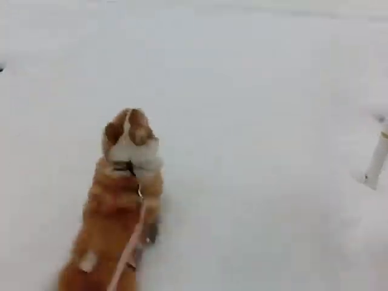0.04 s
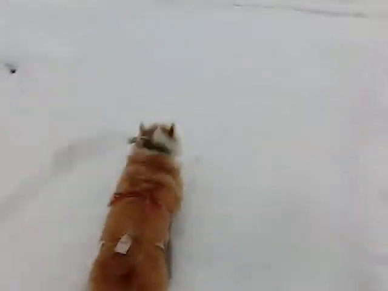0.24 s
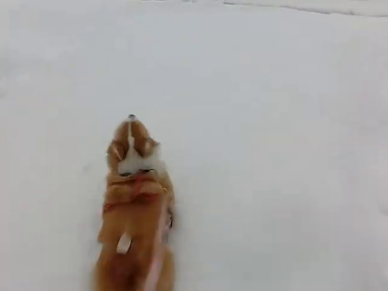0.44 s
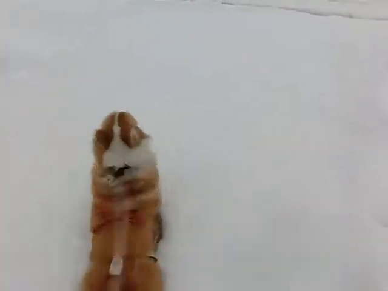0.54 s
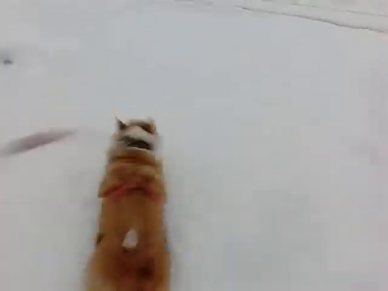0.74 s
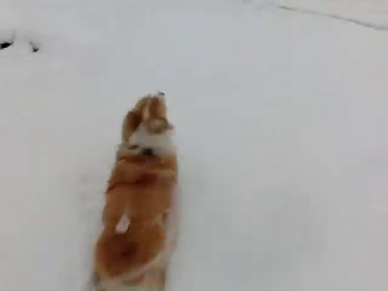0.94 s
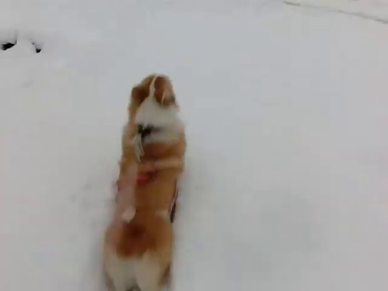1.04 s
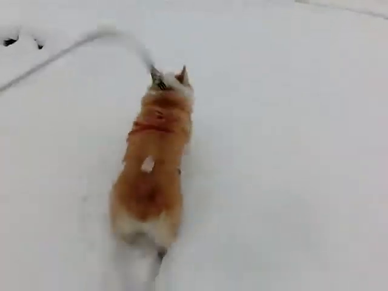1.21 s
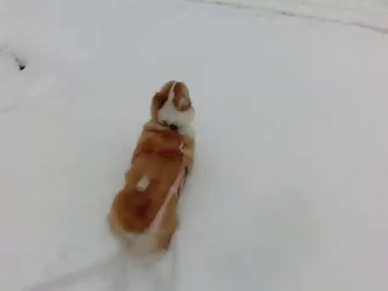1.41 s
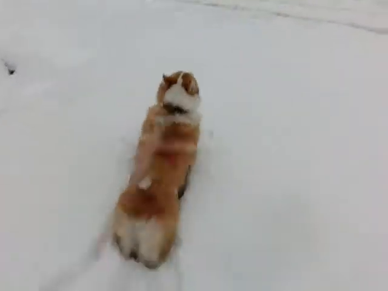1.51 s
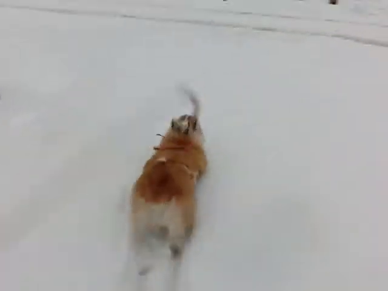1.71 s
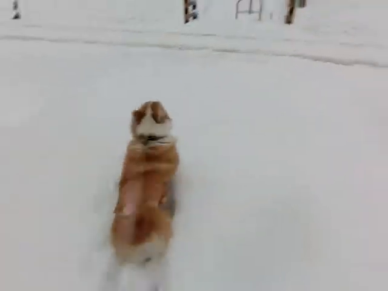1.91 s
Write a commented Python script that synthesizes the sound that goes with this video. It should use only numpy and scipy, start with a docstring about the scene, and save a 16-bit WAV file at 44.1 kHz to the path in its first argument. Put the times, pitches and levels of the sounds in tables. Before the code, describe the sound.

Collar tags and a leash clasp jingle as a dog bounds through powdery snow.

```python
"""Leashed dog bounding through snow

At each bound two metal collar tags and the leash clasp knock together, chatter and ring briefly;
a leash ring and a harness buckle join in. Paws thud and swish in the powder, the running leash
squeaks once, and wind rumbles on the microphone of a hand-held camera just behind the dog."""
import sys
import numpy as np
from scipy import signal
from scipy.fft import rfft, irfft
from scipy.io import wavfile

SR = 44100
rng = np.random.default_rng(int(sys.argv[2]) if len(sys.argv) > 2 else 0)


def dump(signal):
    """Clip the signal to [-1, 1] and save it as 16-bit WAV at the path in sys.argv[1]."""
    limited = np.clip(np.atleast_2d(signal).T, -1, 1)
    pcm = np.round(limited * 32767).astype(np.int16)
    wavfile.write(sys.argv[1], SR, pcm)


N = 85995

# blows on the bright tag: (time [s], ring level [dB], pitch [Hz], relative tick level [dB])
BRIGHT_TAG_HITS = [(0.2907, -30, 8380, -5), (0.2956, -29, 8410, -1), (0.3066, -14, 8380, -5),
                   (0.314, -16, 8380, 5), (0.3287, -29, 8330, 13), (0.4004, -24, 8410, 3),
                   (0.4707, -34, 8480, 3), (0.4773, -37, 8510, 9), (0.4831, -38, 8470, 10),
                   (0.4927, -37, 8380, 6), (0.5421, -29, 8360, -5), (0.5502, -27, 8380, 1),
                   (0.5577, -32, 8410, 7), (0.5723, -35, 8460, 8), (0.6159, -21, 8330, 11.5),
                   (0.6851, -41, 8530, 15), (0.8036, -27, 8350, -5), (0.8108, -32, 8300, 4),
                   (0.9722, -20, 8370, 4), (0.9812, -24, 8340, -5), (1.0035, -19, 8340, 0),
                   (1.0644, -28, 8390, -1), (1.0712, -31, 8380, 9), (1.0831, -28, 8410, -5),
                   (1.0904, -34, 8450, 13), (1.1171, -31, 8360, 0), (1.1455, -30, 8340, 3),
                   (1.2094, -29, 8360, 11), (1.2381, -12, 8280, -5), (1.2584, -23, 8390, -5),
                   (1.2746, -15, 8360, -5), (1.3625, -21, 8390, 8), (1.3746, -22, 8400, -1),
                   (1.3963, -21, 8360, -5), (1.438, -30, 8410, 0), (1.5153, -31, 8510, 6),
                   (1.6744, -22, 8240, -2), (1.6824, -23, 8240, 8), (1.692, -27, 8340, 5),
                   (1.8082, -36, 8390, 0), (1.8637, -38, 8380, 1)]
# resonances: (frequency [Hz], level [dB], t60 [s])
BRIGHT_TAG_MODES = [(8330, 0, .062), (8170, -11, .05), (8430, -12, .05), (8680, -19, .04), (9030, -21, .04)]
CLASP_MODES = [(11260, 4, 0.038), (11960, -7, 0.02), (10130, -10, 0.095)]
# stereo balance of the metal: (frequency [Hz], left minus right [dB])
METAL_PAN = [(3000, 0.5), (8300, 0.5), (10200, 0.5), (11300, -2), (12500, 5), (14500, 0), (16000, -9)]
# stereo width of the metal: (frequency [Hz], left-right coherence [0-1])
METAL_COHERENCE = [(1000, 0.38), (5000, 0.69), (8300, 0.79), (12500, 0.42), (15000, 0.18)]


def amp(db):
    return 10 ** (np.asarray(db) / 20)


def fade(t, t60):
    return amp(-60 * t / t60)


def unit_rms(x):
    return x / np.sqrt(np.mean(x ** 2) + 1e-20)


def event_time():
    return np.arange(6000) / SR


def curve_at(points, hz):
    knots_hz, values = np.transpose(points)
    return np.interp(np.log(hz + 1), np.log(knots_hz + 1), values)


def swell_gain(swells):
    """Bell-shaped swells, summed in power."""
    t = np.arange(N) / SR
    return np.sqrt(sum(amp(db) ** 2 * np.exp(-((t - s) / half_s) ** 2) for s, half_s, db in swells))


def add(mix, start_s, sound):
    part = mix[:, max(round(start_s * SR), 0):][:, :sound.shape[-1]]
    part += sound[..., :part.shape[1]]


def noise(size):
    return rng.standard_normal((2, size))


def slow_noise(shape, cutoff_hz, order=1):
    return signal.lfilter(*signal.butter(order, cutoff_hz, fs=SR), rng.standard_normal(shape))


def colour(pair, spectrum, metal=False):
    """Gives two independent signals a spectrum and the stereo image of metal or air; rms 1."""
    # stereo width of wind and snow: (frequency [Hz], left-right coherence [0-1])
    air_coherence = [(60, 1), (300, 1), (700, 0.98), (1400, 0.93), (3000, 0.91), (8000, 0.28),
                     (15000, 0.19)]
    # their balance: (frequency [Hz], left minus right [dB])
    air_pan = [(100, -0.4), (9000, -0.5), (13000, 2.5)]
    hz = np.fft.rfftfreq(pair.shape[1], 1 / SR)
    coherence = np.clip(curve_at(METAL_COHERENCE if metal else air_coherence, hz), -1, 1)
    lean = amp(curve_at(METAL_PAN if metal else air_pan, hz) / 2)
    mid, side = rfft(pair) * np.sqrt([1 + coherence, 1 - coherence])
    stereo = np.array([(mid + side) * lean, (mid - side) / lean])
    return unit_rms(irfft(stereo * amp(curve_at(spectrum, hz)), pair.shape[1]))


def ring(modes):
    """One blow on a small metal part: damped modes that flutter from loose contact."""
    attack_s, detune, flutter_db = .0005, .003, -15
    t, out, sides = event_time(), 0, np.array([[.5], [-.5]])
    for hz, db, t60 in modes:
        offset, skew = rng.standard_normal(2)
        spread_rad = np.arccos(np.clip(curve_at(METAL_COHERENCE, hz), 0, 1))
        start_rad = 2 * np.pi * rng.random() + sides * skew * spread_rad
        phase = 2 * np.pi * hz * (1 + detune * offset) * t + start_rad
        flutter, jitter = amp(flutter_db) * unit_rms(slow_noise((2, len(t)), cutoff_hz=240))
        tone = (1 + flutter) * np.sin(phase) + jitter * np.cos(phase)
        out = out + amp(db + sides * curve_at(METAL_PAN, hz)) * fade(t, t60) * tone
    return out * np.minimum(t / attack_s, 1)


def chatter(blow, count=3, mean_gap_s=.006, rebound_db=-12):
    """A blow and its ever weaker rebounds."""
    out = blow.copy()
    for k, s in enumerate(np.cumsum(mean_gap_s * (.5 + rng.random(count)))):
        add(out, s, blow * amp(rebound_db) / (k + 1))
    return out


def bright_tag():
    """The tag rings near 8 kHz; each blow also adds a short tick near 8.5 kHz, with weaker rebounds."""
    nominal_hz, tick_hz, tick_rise_s, tick_gain_db = 8330, 8450, .0008, -1
    out, t = np.zeros((2, N)), event_time()
    tick_envelope = (t / tick_rise_s) ** 2 * np.exp(2 - 2 * t / tick_rise_s)
    for s, db, pitch_hz, tick_db in BRIGHT_TAG_HITS:
        tone = ring([(hz * pitch_hz / nominal_hz, mode_db, t60) for hz, mode_db, t60 in BRIGHT_TAG_MODES])
        tick = np.sin(2 * np.pi * (tick_hz * t + rng.random())) * tick_envelope
        add(out, s, amp(db) * (tone + amp(tick_db + tick_gain_db) * chatter(tick[None])))
    return out


def large_tag(gain_db=2.5):
    """The tag rings in widely spaced modes; the place of the blow weights the first two."""
    # blows: (time [s], relative level [dB], low mode offset [dB], middle mode offset [dB])
    hits = [(0.0913, -33.5, -7.5, 4.5), (0.1436, -31, -26, -15), (0.2618, -31, -16, -11),
            (0.3072, -24, -8, 4), (0.3128, -31, -1, 2), (0.542, -28, -9.5, -20), (0.645, -34, -9, -10),
            (0.8052, -34, -6, 0), (0.9727, -25.5, -17, -10), (0.981, -27, -27, -16),
            (1.2397, -11, -20.5, -5.5), (1.3649, -26, -17, -13), (1.3709, -31.5, -3.5, -7),
            (1.3824, -23, -23, -16), (1.5096, -39, -5, -3), (1.6811, -21.5, -8, -11), (1.851, -39, -20, -1)]
    # resonances: (frequency [Hz], level [dB], t60 [s])
    modes = [(5360, 3, 0.054), (10160, 2.5, .042), (12530, 1, .04), (3520, -28, 0.07), (13280, -19, .045),
             (15600, -24, 0.049)]
    out = np.zeros((2, N))
    for s, db, low_db, middle_db in hits:
        offsets_db = [low_db, middle_db] + [0] * (len(modes) - 2)
        struck = [(hz, mode_db + offset, t60) for (hz, mode_db, t60), offset in zip(modes, offsets_db)]
        add(out, s, amp(db + gain_db) * ring(struck))
    return out


def leash_hardware():
    """Clasp, leash ring and harness buckle: each rings in its own modes and rebounds."""
    # blows: (time [s], relative level [dB])
    clasp_hits = [(0.0908, -33.5), (0.1425, -39), (0.378, -38), (0.4005, -42), (0.4425, -40), (0.636, -35),
                  (0.6474, -34.5), (0.917, -34.5), (1.276, -34), (1.371, -29), (1.513, -31.5),
                  (1.6282, -41), (1.9002, -36.5)]
    ring_hits = [(0.8627, -35), (0.878, -27.5), (0.8875, -18)]
    buckle_hits = [(.307, -37.5), (.944, -45), (.966, -40), (1.004, -44), (1.111, -46), (1.452, -41.5),
                   (1.765, -47)]
    # resonances: (frequency [Hz], level [dB], t60 [s])
    ring_modes = [(7170, 4, 0.026), (7300, -9, 0.031)]
    buckle_modes = [(3568, 0, 0.089)]
    parts = (clasp_hits, CLASP_MODES, 1.5), (ring_hits, ring_modes, -5.5), (buckle_hits, buckle_modes, 0)
    out = np.zeros((2, N))
    for hits, modes, gain_db in parts:
        for s, db in hits:
            add(out, s, amp(db + gain_db) * chatter(ring(modes)))
    return out


def touches(count=3, mean_gap_s=.022, gain_db=-20):
    """The bright tag swings on after a blow and brushes the clasp, more weakly each time."""
    out = np.zeros((2, N))
    for s, db, _, _ in BRIGHT_TAG_HITS:
        for k, delay_s in enumerate(np.cumsum(mean_gap_s * (.5 + rng.random(count)))):
            touch = ring(BRIGHT_TAG_MODES) + .5 * rng.random() * ring(CLASP_MODES)
            add(out, s + delay_s, amp(db + gain_db) / (k + 1) * chatter(touch))
    return out


def clacks(gain_db=-8.5):
    """Hard metal contacts: a broadband snap, then a short, clumpy rattle."""
    # contacts: (time [s], relative level [dB])
    hits = [(0.0906, -28.5), (0.306, -15.5), (0.3124, -17.5), (0.4054, -29.5), (0.5425, -22), (0.626, -23),
            (0.8041, -26.5), (0.8117, -27), (0.8783, -28), (0.9134, -39), (1.0014, -26), (1.2389, -14),
            (1.277, -27), (1.3459, -23), (1.3734, -22.5), (1.5086, -21.5), (1.6813, -19), (1.6935, -22.5)]
    # rattle spectrum: (frequency [Hz], density [dB])
    spectrum = [(1000, 0), (2200, -5), (3600, 0), (6000, -1.5), (9000, 8.5), (11000, 6.5), (14000, 3.5),
                (15800, -5)]
    rattle_t60_s, snap_s, snap_db = .06, .0007, -4
    out, t = np.zeros((2, N)), event_time()
    envelope = fade(t, rattle_t60_s) + amp(snap_db) * np.exp(-t / snap_s)
    for s, db in hits:
        clumps = abs(slow_noise(len(t), cutoff_hz=700))
        grit = colour(noise(len(t)) * np.sqrt(clumps), spectrum, metal=True)
        add(out, s, amp(db + gain_db) * envelope * grit)
    return out


def clicks():
    """An edge slips over metal: a bright snap and a trace of scraping."""
    # glancing contacts: (time [s], level [dB])
    hits = [(0.2554, -28), (.3066, -27), (.804, -21.5), (.8285, -27), (.8435, -28), (.8873, -21),
            (.8925, -27), (.9135, -21), (.955, -26), (1.2381, -13), (1.362, -25.5)]
    # snap spectrum: (frequency [Hz], density [dB])
    spectrum = [(1000, -10.5), (9000, -5.5), (13000, 8.5), (14800, -4), (16000, 1)]
    snap_s, scrape_db, scrape_t60_s = .0007, -11, .04
    out, t = np.zeros((2, N)), event_time()
    envelope = np.exp(-t / snap_s) + amp(scrape_db) * fade(t, scrape_t60_s)
    for s, db in hits:
        add(out, s, amp(db) * envelope * colour(noise(len(t)), spectrum, metal=True))
    return out


def rubs(contacts_per_s=900):
    """Tags and clasp slide over each other: runs of tiny, choked contacts."""
    # slides: (centre [s], half width [s], level [dB])
    slides = [(.02, .03, -41.5), (.125, 0.035, -45.5), (.43, 0.041, -46), (.85, .025, -41.5),
              (1.664, .01, -37), (1.753, 0.0083, -35), (1.905, .018, -46.5)]
    # contact spectrum: (frequency [Hz], density [dB])
    spectrum = [(5000, -24), (7600, -12), (8500, 5), (9900, -7), (11400, 1), (15500, -13)]
    contacts = noise(N) * (rng.random(N) < contacts_per_s / SR)
    return swell_gain(slides) * colour(contacts, spectrum, metal=True)


def echo(sound, level_db=-17, t60_s=.12):
    """A short, diffuse tail."""
    t = event_time()
    tail = noise(len(t)) * fade(t, t60_s)
    return amp(level_db) * signal.fftconvolve(sound, tail / np.linalg.norm(tail[0]), axes=1)[:, :N]


def thuds(gain_db=1):
    """Soft bumps of wind, leash and paws: a low, quickly damped push with a dull puff."""
    # bumps: (time [s], relative level [dB])
    hits = [(0.109, -27), (0.201, -21.5), (0.208, -23.5), (0.218, -20), (0.228, -30.5), (0.239, -22),
            (0.653, -32.5), (0.748, -29.5), (0.762, -28), (1.403, -30.5), (1.507, -28.5), (1.547, -35)]
    # puff spectrum: (frequency [Hz], density [dB])
    spectrum = [(60, -43), (130, -1.5), (450, -1), (800, -14), (1500, -31), (4000, -66)]
    push_hz, rise_s, puff_db, puff_t60_s = 137, .0012, -8.5, .037
    out, t = np.zeros((2, N)), event_time()
    push = np.sin(2 * np.pi * push_hz * t) * t / rise_s * np.exp(1 - t / rise_s)
    for s, db in hits:
        puff = colour(noise(len(t)), spectrum) * fade(t, puff_t60_s) * np.minimum(t / rise_s, 1)
        add(out, s, amp(db + gain_db) * (push + amp(puff_db) * puff))
    return out


def snow(grains_per_s=5000):
    """Powder swishes and gives way in clumps of grains; the landing body pushes out a low puff."""
    # paw sweeps and landings: (centre [s], half width [s], level [dB])
    sweeps = [(.10,0.071,-46.5), (.35,0.079,-45.5), (.56,0.048,-44.5), (.64,0.059,-45.5), (.85,0.071,-43.5),
              (1.0,0.032,-41.5), (1.09,0.021,-45), (1.213,0.0083,-40), (1.28,0.12,-47), (1.46,0.071,-44.5),
              (1.72,0.077,-45.5), (1.94,0.048,-46)]
    landings = [(.03,0.032,-41), (.33,0.022,-43.5), (.54,0.0071,-41), (.73,0.048,-40), (1.39,0.027,-40.5),
                (1.53,0.018,-45.5)]
    # their spectra: (frequency [Hz], density [dB])
    swish_spectrum = [(200, -48), (700, 3.5), (1800, 3), (3600, 2.5), (6000, 1.5), (9000, 1), (12000, 4),
                      (15500, -8)]
    puff_spectrum = [(50, -2), (130, 3), (350, -1.5), (800, -12.5), (2000, -17), (8000, -59)]
    clumps = unit_rms(slow_noise(N, cutoff_hz=70, order=2)) ** 2
    grains = noise(N) * (rng.random(N) < clumps * grains_per_s / SR)
    crunch = colour(grains, swish_spectrum)
    swish = colour(noise(N), swish_spectrum)
    puff = colour(noise(N), puff_spectrum)
    return swell_gain(sweeps) * (swish + crunch) + swell_gain(landings) * puff


def leash_squeak(start_s=.762, length_s=.044, top_hz=14500, rise_hz=1100, level_db=-50):
    """The leash runs out quickly: a faint whistle that rises and falls with its speed."""
    speed = np.sin(np.pi * np.arange(0, length_s, 1 / SR) / length_s)
    phase = 2 * np.pi * np.cumsum(top_hz - rise_hz * (1 - speed)) / SR
    out = np.zeros((2, N))
    add(out, start_s, amp(level_db) * np.sqrt(abs(speed)) * np.sin(phase))
    return out


def wind(gain_db=-37, deep_hz=65, steadiness=.7):
    """Wind on the microphone: a deep rumble, its surges partly evened out, and a faint hiss."""
    # wind spectrum: (frequency [Hz], density [dB])
    spectrum = [(15, -4.5), (30, -5.5), (38, -4), (52, -2.5), (62, -12.5), (80, -12), (125, -17.5),
                (300, -25.5), (900, -30.5), (2000, -37.5), (5000, -45), (15000, -43.5)]
    air = colour(noise(N), spectrum)
    deep = signal.sosfiltfilt(signal.butter(4, deep_hz, fs=SR, output="sos"), air)
    surge = unit_rms(abs(signal.hilbert(deep[0]))) + .2
    return amp(gain_db) * (air - deep + deep / surge ** steadiness)


def scene():
    metal = bright_tag() + large_tag() + leash_hardware() + touches() + clacks() + clicks() + rubs()
    return metal + echo(metal) + thuds() + snow() + leash_squeak() + wind()


def record(dry):
    """The camera's band limit."""
    cutoff_hz = 15950
    lowpass = signal.firwin(255, cutoff_hz, window=("kaiser", 8), fs=SR)
    return signal.oaconvolve(dry, lowpass[None], "same")


dry = scene()
out = record(dry)
dump(out)
```